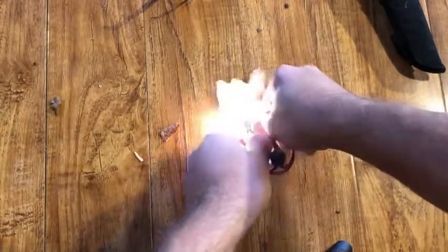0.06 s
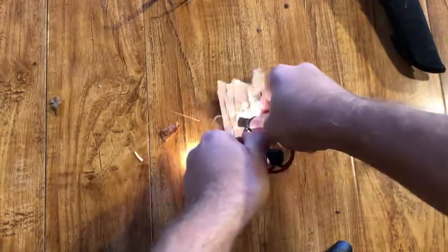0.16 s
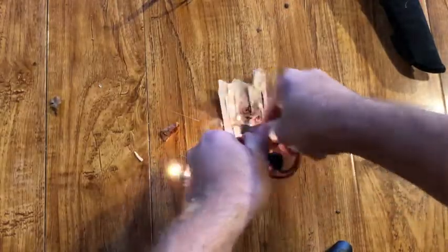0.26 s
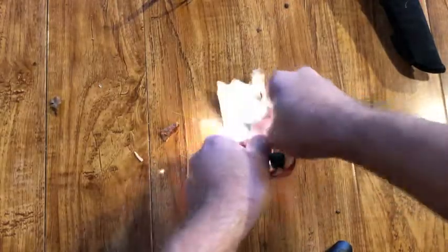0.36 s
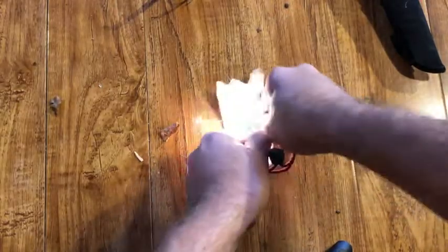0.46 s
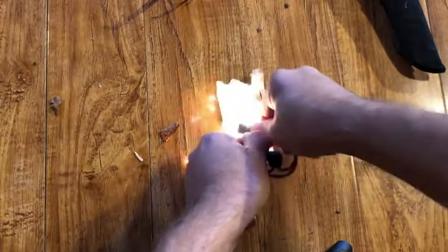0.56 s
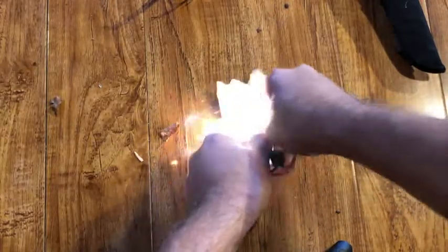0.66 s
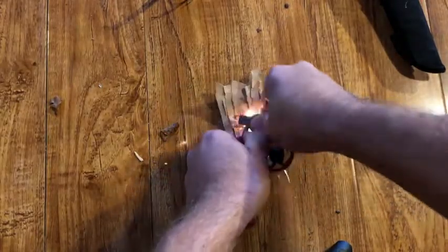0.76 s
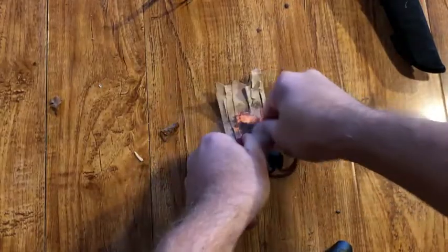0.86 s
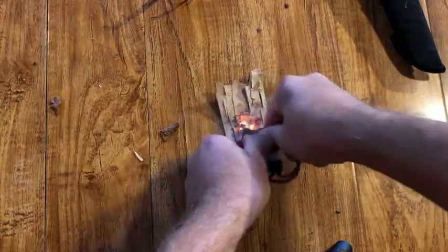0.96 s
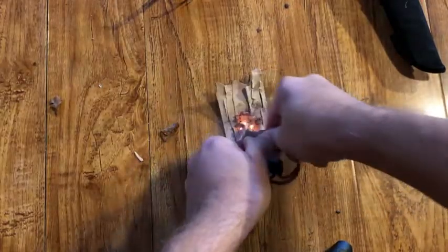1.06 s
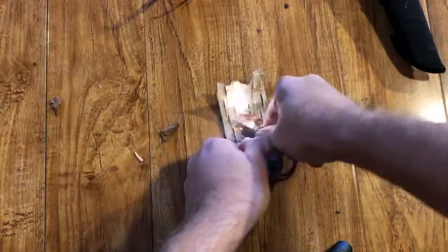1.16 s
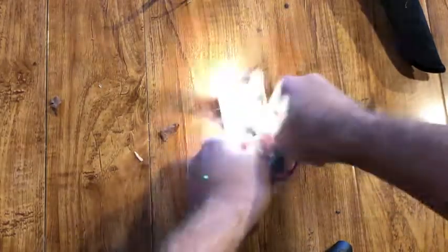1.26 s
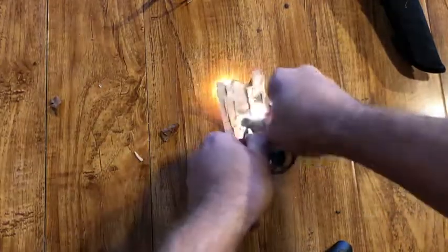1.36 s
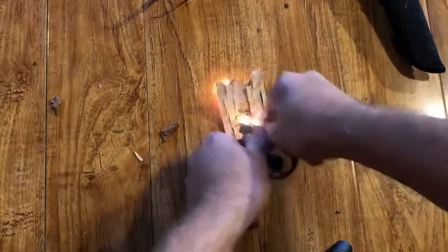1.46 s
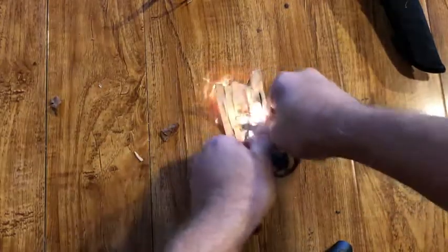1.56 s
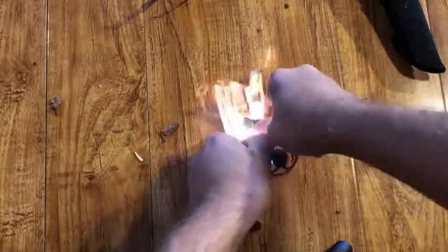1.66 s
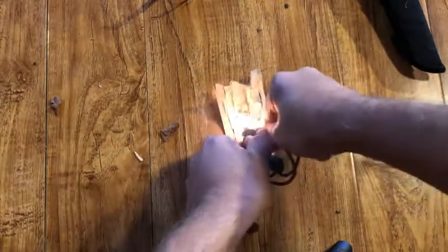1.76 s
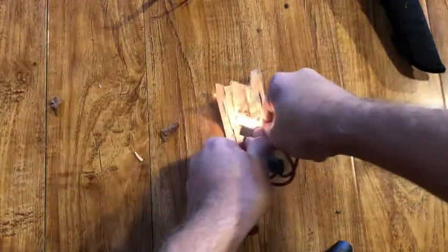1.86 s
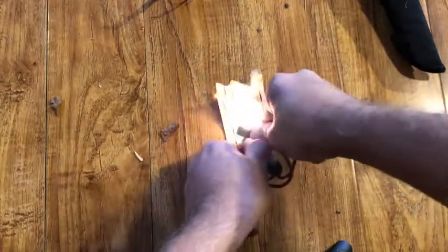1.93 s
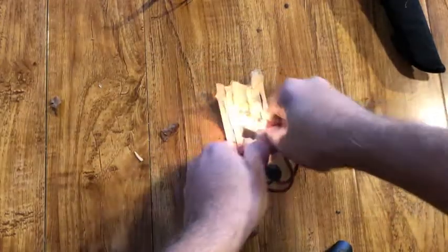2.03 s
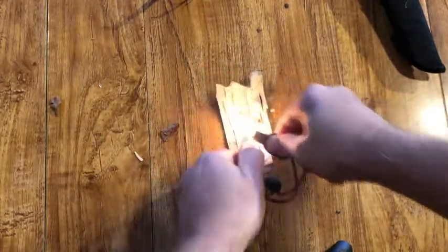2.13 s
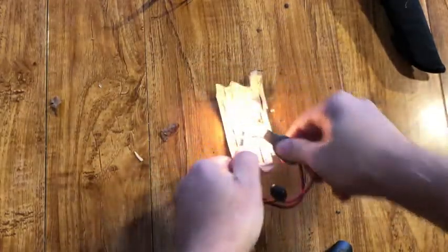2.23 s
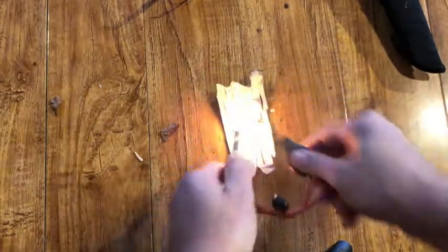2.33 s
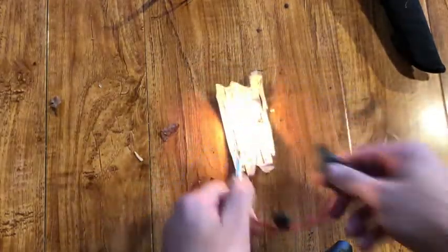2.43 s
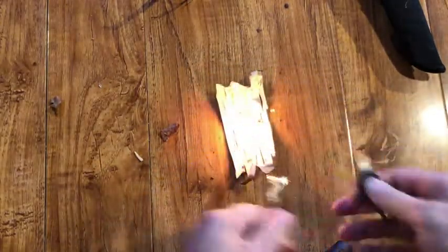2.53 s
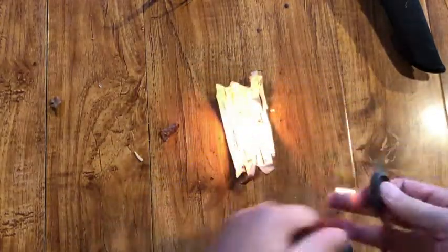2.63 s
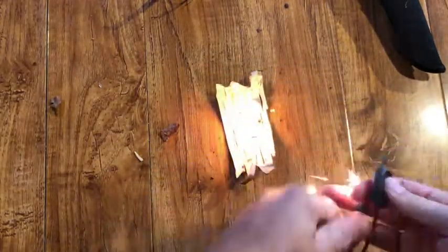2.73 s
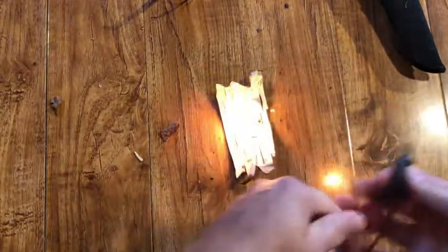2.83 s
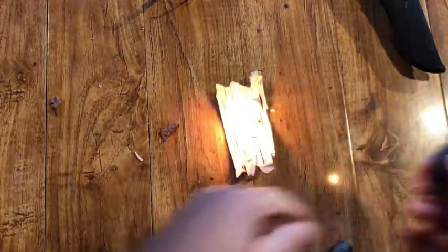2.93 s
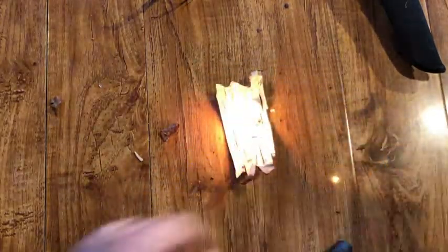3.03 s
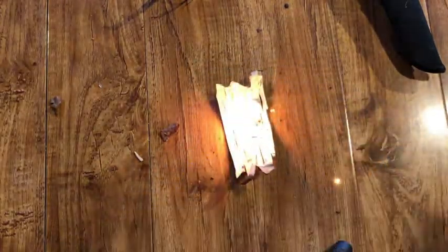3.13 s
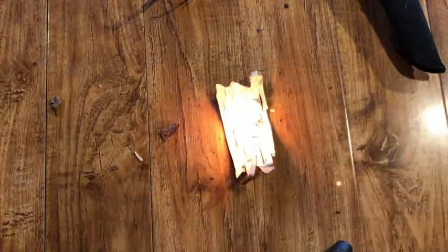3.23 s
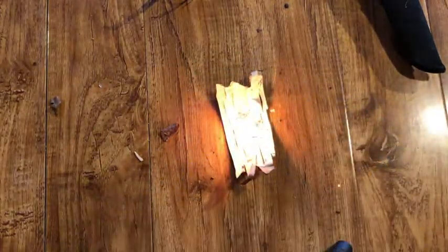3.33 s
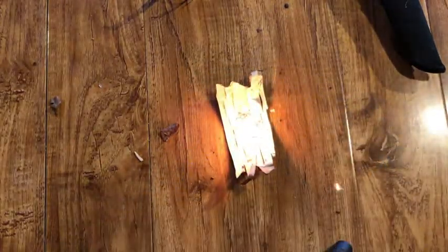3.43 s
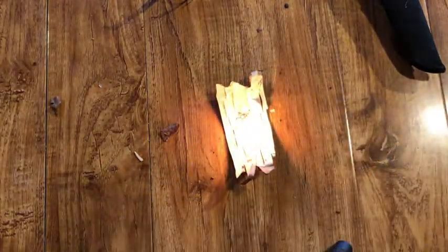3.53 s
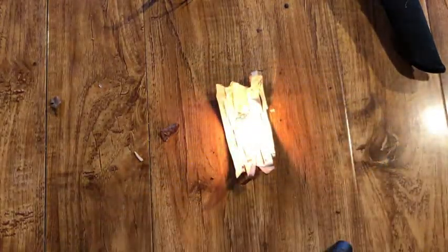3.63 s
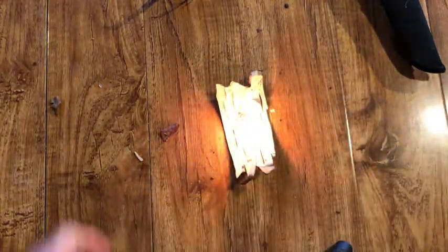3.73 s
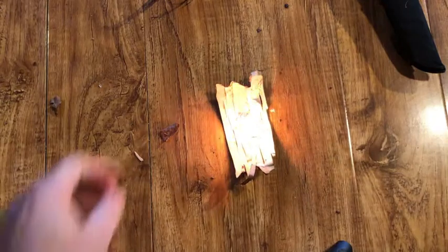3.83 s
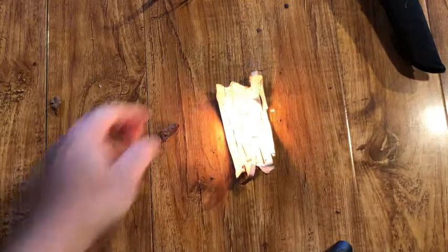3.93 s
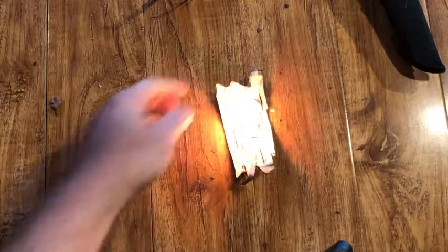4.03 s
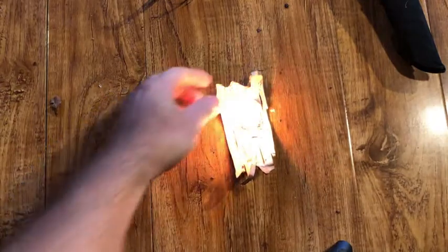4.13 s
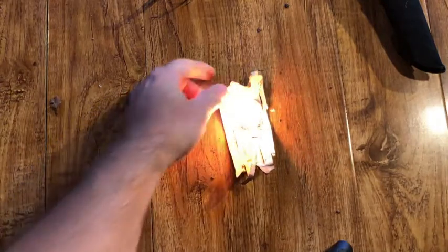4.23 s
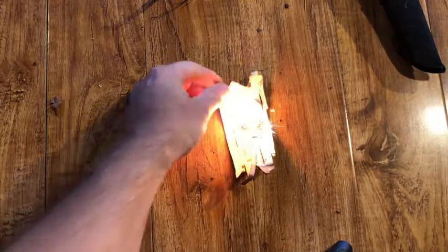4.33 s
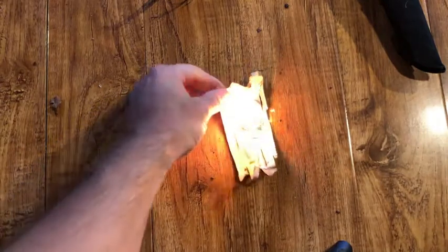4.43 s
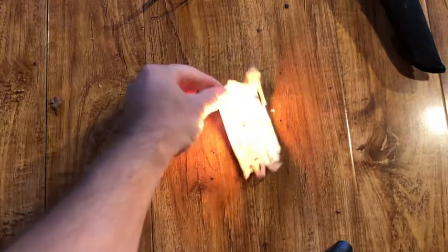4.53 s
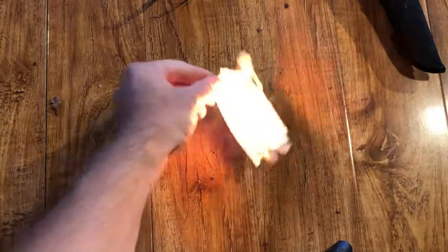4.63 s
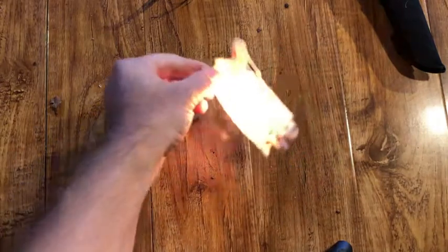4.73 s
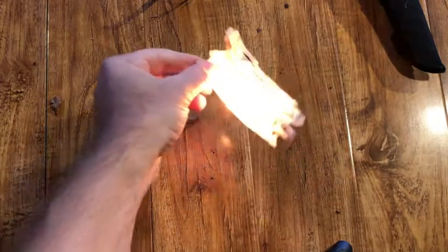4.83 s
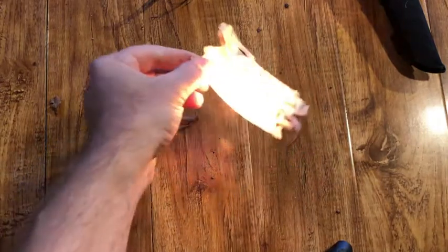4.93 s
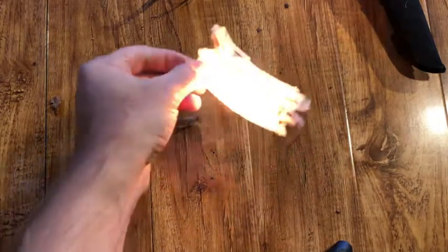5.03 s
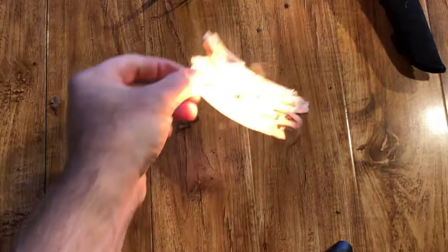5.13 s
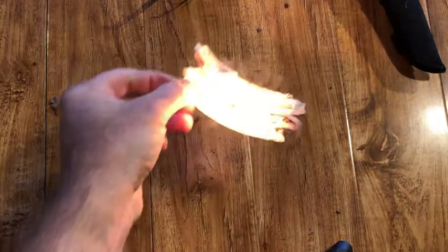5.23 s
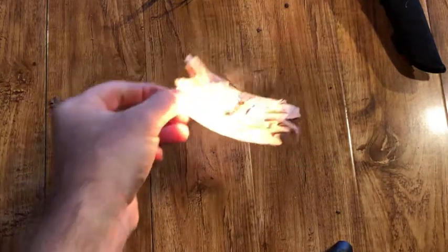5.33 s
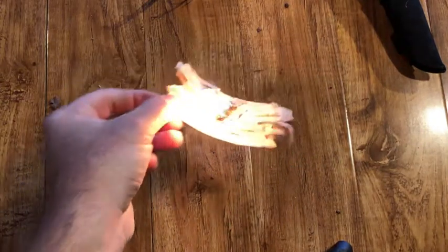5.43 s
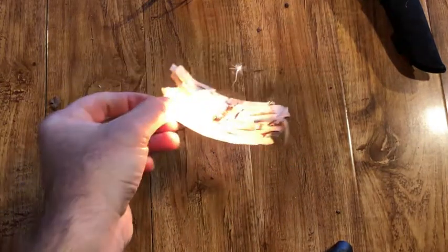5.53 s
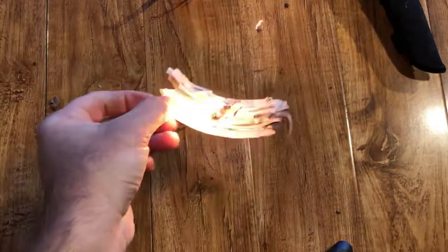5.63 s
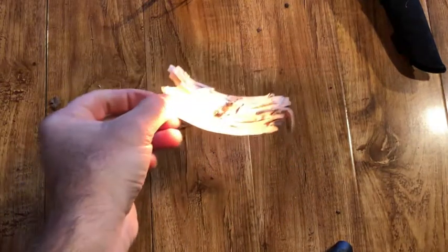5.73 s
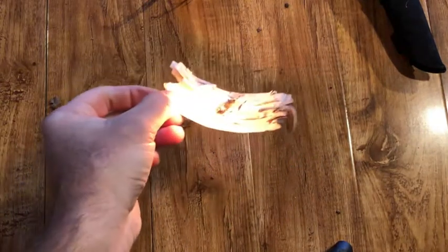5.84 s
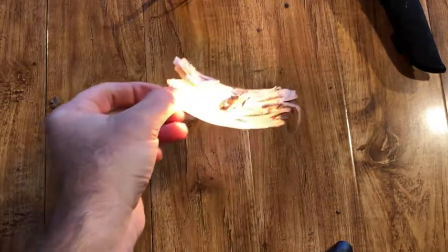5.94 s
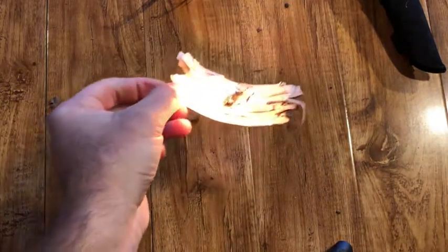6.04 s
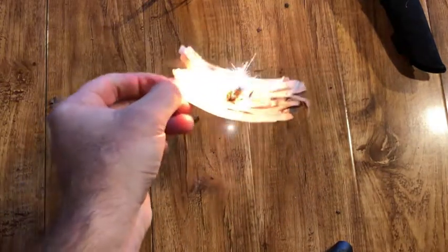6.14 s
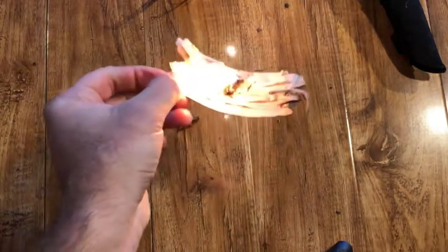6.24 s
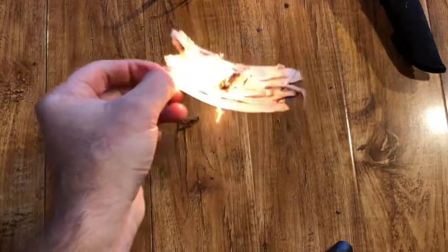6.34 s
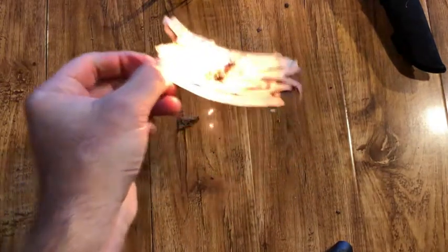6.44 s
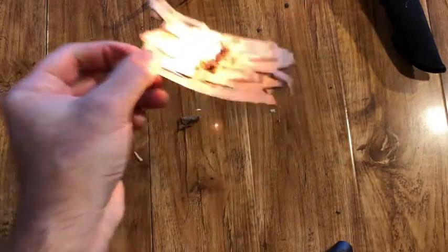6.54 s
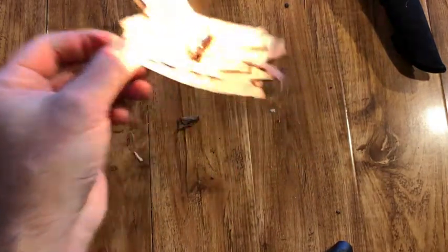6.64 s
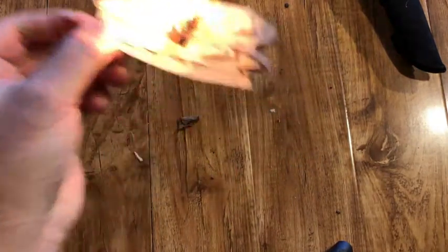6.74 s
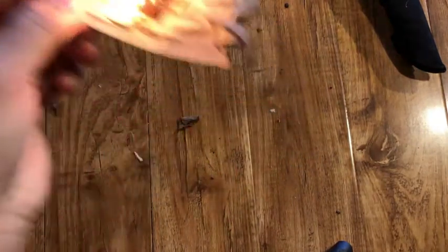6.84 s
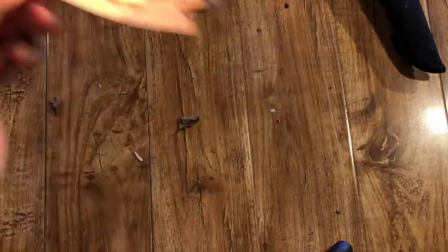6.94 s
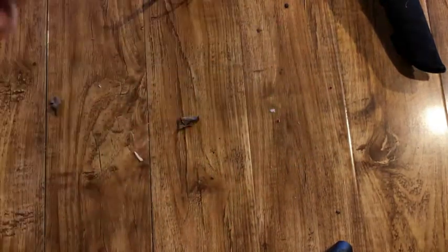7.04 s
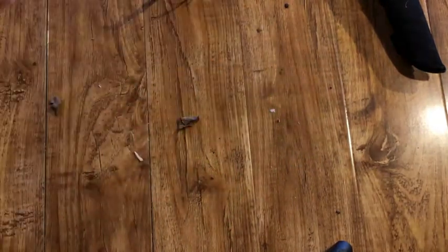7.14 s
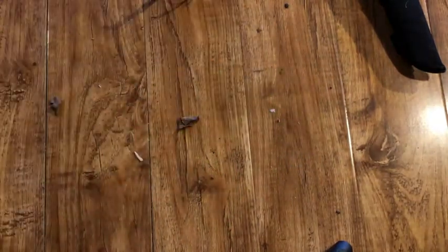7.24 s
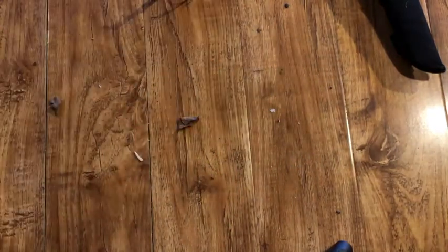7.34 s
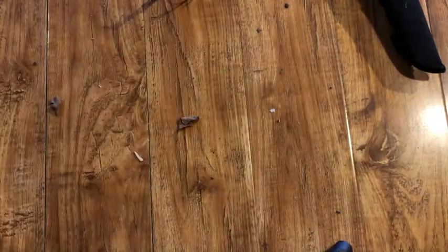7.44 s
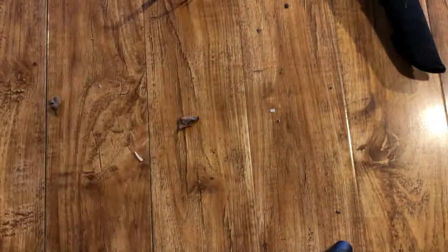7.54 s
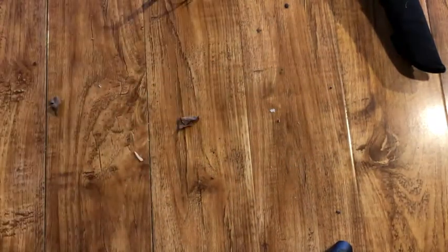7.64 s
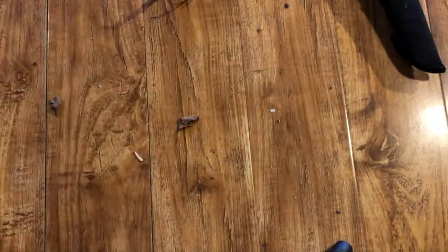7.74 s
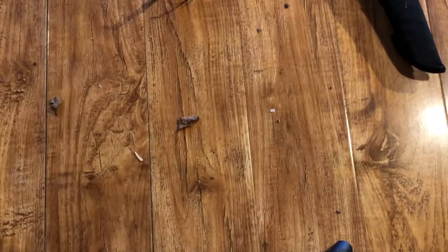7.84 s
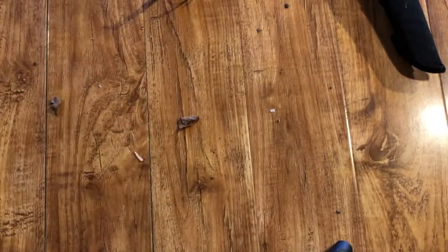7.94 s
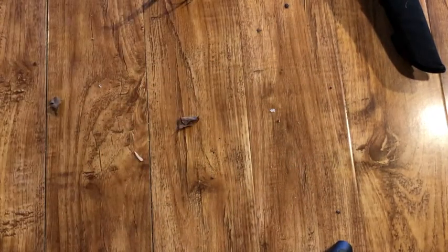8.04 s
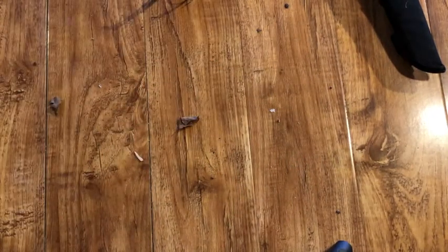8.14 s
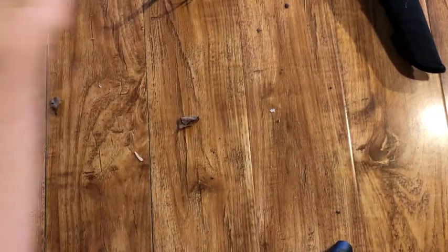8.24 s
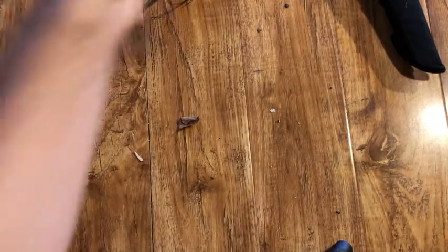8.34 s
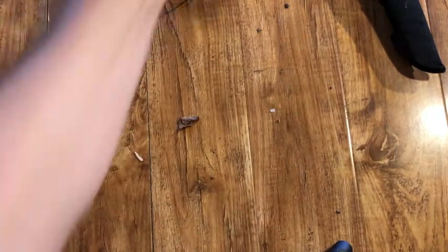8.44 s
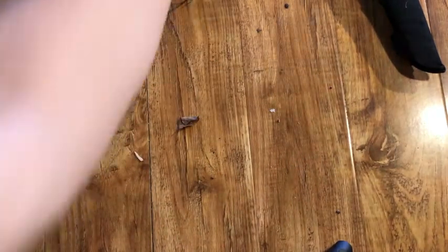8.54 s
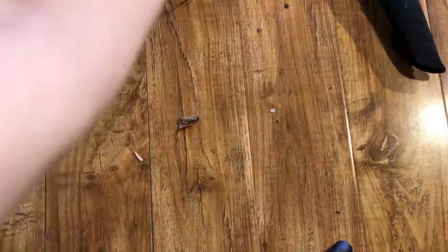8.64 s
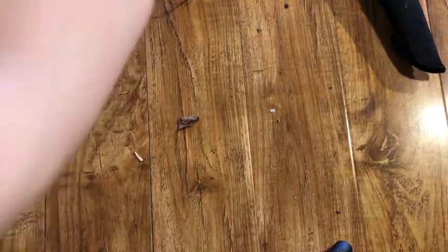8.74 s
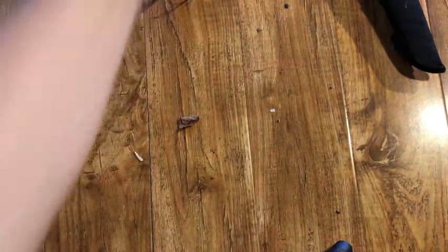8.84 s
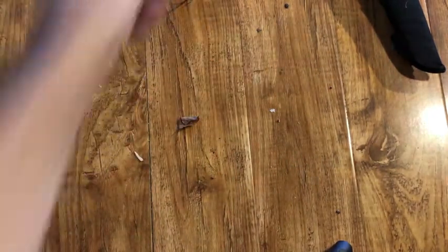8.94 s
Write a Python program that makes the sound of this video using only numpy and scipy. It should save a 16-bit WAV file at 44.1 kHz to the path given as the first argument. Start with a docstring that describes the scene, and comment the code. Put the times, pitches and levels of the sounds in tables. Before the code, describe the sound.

In a small, quiet room, close to the microphone, steel is scraped in fast uneven bursts, gritty and bright over a low table rumble. After two seconds it calms: hand brushes, tiny clinks, a sudden hard clatter on wood. Then dry little pops of burning bark, soft hand bumps, a breathy flame growing and fading near seven seconds, a late snap and bump, and light fumbling ticks.

```python
"""Quick gritty scrapes come first: a striker stick-slips along a fire steel pressed on a wooden table.
Random slips excite table and rod resonances, and shaped noise grains make the fizz of shavings and sparks.
Then birch bark crackles in noise pops, tools clink in ticks, and a hard thing lands on ringing wood modes.
Hands brush and bump, and a flame rushes in filtered noise as the bark is lifted.
A small quiet room reflects all but the flame; steady noise and draughts lie underneath."""
import sys
import numpy as np
from scipy import signal
from scipy.fft import rfft, irfft, next_fast_len
from scipy.io import wavfile
from scipy.ndimage import uniform_filter1d, map_coordinates

SR = 44100
rng = np.random.default_rng(int(sys.argv[2]) if len(sys.argv) > 2 else 0)


def dump_mix(stems):
    """Bounce the given channels to the path in sys.argv[1] as a 16-bit WAV at rate SR."""
    frames = np.atleast_2d(stems).T  # one column per channel
    limited = np.clip(frames, -1, 1)  # hard clip at full scale
    pcm = np.round(limited * 32767).astype(np.int16)
    wavfile.write(sys.argv[1], SR, pcm)


N = 396457

# All table levels are relative: each layer's gain and the room come on top.
# Pushes and returns of the striker:
# (start [s], length [s], table rumble [dB], rod rasp [dB], spark fizz [dB])
STROKES = [(0.0, 0.11, -30, -31, -38.5), (0.189, 0.062, -43, -40.5, -44), (0.32, 0.043, -44, -42, -59),
           (0.362, 0.053, -31, -31, -37), (0.483, 0.065, -53, -48, -47), (0.531, 0.05, -40, -41, -51),
           (0.645, 0.074, -33, -34.5, -40.5), (0.822, 0.18, -45.5, -44, -58),
           (1.145, 0.026, -38, -30.5, -48), (1.203, 0.045, -68, -53, -42.5), (1.276, 0.043, -32, -33, -40),
           (1.359, 0.043, -38.5, -40.5, -44), (1.438, 0.041, -38, -39.5, -50),
           (1.567, 0.065, -34, -31.5, -36.5), (1.705, 0.067, -41.5, -40.5, -45.5),
           (1.812, 0.063, -50, -49.5, -64.5), (1.91, 0.096, -58, -55, -56.5)]
# How each layer follows a stroke: (attack [s], sag while pushing [dB/s], release [dB/s])
RUMBLE_SHAPE = (.002, 35, 810)
RASP_SHAPE = (.013, 33, 500)
FIZZ_SHAPE = (0.0092, 35, 206)
# Resonances of the table and of the rod: (frequency [Hz], width [Hz], level [dB])
TABLE_RESONANCES = [(96.5, 12.3, -2.5), (160, 24, 2.5), (231, 34.3, 0), (307, 50, 2.5)]
ROD_RESONANCES = [(513, 40, -9), (645, 103, -10.5), (816, 76, -5), (1140, 110, -6.5), (1307, 106, -3),
                  (1531, 75, -3), (2126, 140, -9)]
# Spectrum of steel grit: (frequency [Hz], level [dB])
GRIT_SPECTRUM = [(1410, -39), (2400, -3), (3030, -9), (3340, -3), (4150, -3.5), (4650, -2.5), (5600, -10),
                 (7730, -11.5), (8450, -9.5), (13500, -15), (15000, -17.5), (15800, -40), (16500, -61)]


def scraping():
    """Stick-slip friction: irregular slips shake the table and the rod, and torn shavings fizz."""
    rumble = sum(amp(db) * gesture(s, length, *RUMBLE_SHAPE) for s, length, db, _, _ in STROKES)
    rasp = sum(amp(db) * gesture(s, length, *RASP_SHAPE) for s, length, _, db, _ in STROKES)
    fizz = sum(amp(db) * gesture(s, length, *FIZZ_SHAPE) for s, length, _, _, db in STROKES)
    chatter = amp(2.3 * wobble(170))
    slips = unit(chatter * grains(rate=1400, spread_db=3.5))
    table = amp(-3.5) * rumble * unit(resonate(slips, TABLE_RESONANCES))
    rod = amp(-0.62) * rasp * unit(resonate(slips, ROD_RESONANCES))
    shavings = chatter * amp(1.5 * wobble(300)) * grains(rate=1900, spread_db=5.5)
    shavings = shavings + 0.56 * slips
    # the steel's bright resonances shift as the contact point travels
    grit = unit(patchy(coloured(shavings, GRIT_SPECTRUM), depth_db=3.8))
    # where the fizz is weak it also sounds duller
    treble = filtered(grit, lambda f: f ** 4 / (f ** 4 + 5500 ** 4))
    dullness = 1 / (1 + fizz / amp(-74.5))
    return table, rod + amp(-1.37) * fizz * (grit - dullness * treble)


# The striker's edge catches on the rod: (time [s], crack level [dB], knock level [dB])
CATCHES = [(0.1481, -15.5, -47), (0.3661, -16, -47), (0.6781, -15, -29), (0.7323, -32, -23),
           (1.1484, -14, -28), (1.1546, -10.5, -33), (1.2812, -11.5, -37), (1.5266, -45, -26),
           (1.56, -27, -23), (1.5792, -17, -24)]


def catches():
    """Impulsive excitation: the edge bites with a gritty crack and drives the rod against the table."""
    out = np.zeros(N)
    for s, crack_db, knock_db in CATCHES:
        crack = coloured(burst(0.041), GRIT_SPECTRUM)
        knock = resonate(burst(0.019), TABLE_RESONANCES + ROD_RESONANCES[:2])
        add(out, s, crack_db - 23.0, crack)
        add(out, s, knock_db - 6.0, knock)
    return out


# Things land and rock on the table: (time [s], level [dB], top of the crack [Hz])
KNOCKS = [(3.7699, -16.5, 6000), (3.7749, -28.5, 5900), (3.8112, -24.5, 3000), (3.8564, -22.5, 5360),
          (3.8717, -17, 6000), (7.847, -58, 1470), (7.888, -40.5, 2180)]
# Modes of the knocked table top: (frequency [Hz], level [dB], t60 [s])
WOOD_MODES = [(576, 5.5, 0.026), (708, 4.5, 0.069), (1180, 19, 0.042), (1330, 9.5, 0.02), (1950, 4.5, .018),
              (2890, 2, 0.043), (4200, -32, 0.0058)]


def knocks():
    """Modal impact: a hard contact gives a crack, duller if softer, and damped modes of wood ring."""
    out = np.zeros(N)
    t = np.arange(SR // 4) / SR
    for s, db, top_hz in KNOCKS:
        ring = np.zeros(len(t))
        for hz, level, t60 in WOOD_MODES:
            decay = amp(level + 2 * rng.normal() - 60 * t / t60)
            softening = 1 / (1 + (hz / top_hz) ** 2)
            ring += decay * softening * np.sin(2 * np.pi * hz * t + rng.uniform(0, 2 * np.pi))
        crack = burst(0.02)
        crack[0] += 5
        spectrum = [(70, -30), (170, -7), (260, -5), (380, 4), (top_hz / 2, 1),
                    (top_hz, -5), (1.5 * top_hz, -18), (2.9 * top_hz, -28)]
        add(out, s, db - 14, ring)
        add(out, s, db - 4, coloured(crack, spectrum))
    return out


# Loud snaps of the burning bark: (time [s], level [dB], splutter gain [dB])
SNAPS = [(4.2696, -37, -42), (4.3878, -38, -38), (4.9679, -49.5, -53), (5.0218, -38.5, -34),
         (5.526, -21, -51), (5.5796, -28, -48), (5.9628, -41.5, -40), (5.9887, -35.5, -28.5),
         (6.0722, -42, -32), (6.132, -28, -15.5), (6.1535, -13.5, -29.5), (6.2738, -46.5, -22),
         (6.4557, -36.5, -30), (7.9031, -22.5, -38), (8.3206, -42.5, -40)]
# Spectrum of a snap: (frequency [Hz], level [dB])
SNAP_SPECTRUM = [(200, -16), (1000, -15), (2500, -13), (4000, -7), (8000, -9), (11000, -4), (16000, -10)]
# faint snaps fall at random times in this span
BURN_START_S, BURN_END_S = 2.0, 6.9


def crackle():
    """Sudden pressure release: a blister bursts in one spike, then a splutter of smaller ones."""
    out = np.zeros(N)
    ticks = [(BURN_START_S + when * (BURN_END_S - BURN_START_S), -47 - 10 * softness, -38)
             for when, softness in rng.random(size=(12, 2))]
    for s, db, splutter_db in SNAPS + ticks:
        splutter = 0.12 * burst(0.008) + amp(splutter_db) * burst(0.057)
        pop = 1.3 * spiky(splutter)
        pop[0] += 1
        add(out, s, db - 4.0, coloured(pop, SNAP_SPECTRUM))
    return out


# Light contacts of tools and fingers; the row at 4.3322 s is a faint repeat of the click just before: (time
# [s], level [dB], brightness [dB])
CLINKS = [(2.6085, -43, 21), (2.628, -48, 31), (2.6887, -44, -5), (2.704, -32.5, -15), (2.749, -46, -9),
          (2.9014, -38, -8), (4.3242, -25, -10.5), (4.3322, -32, -11), (8.745, -35, -12),
          (8.7715, -32.5, 1), (8.861, -39, -25), (8.9395, -37.5, 0), (8.961, -38, 9), (8.9844, -37.5, 6)]
# Spectrum of a light contact: (frequency [Hz], level [dB])
CLINK_SPECTRUM = [(200, -14), (800, -9.5), (1500, -6), (3000, -2.5), (6000, -1.5), (10000, -1.5),
                  (16000, -4.5)]


def clinks():
    """Brief collision: each light contact is a sharp tick and a short skid of tiny impacts."""
    out = np.zeros(N)
    for s, db, bright_db in CLINKS:
        # brightness tilts the treble up or down
        spectrum = [(hz, level + (bright_db + 9) * hz / (hz + 5000)) for hz, level in CLINK_SPECTRUM]
        tick_and_skid = burst(0.0092) + .13 * spiky(burst(0.1))
        add(out, s, db, coloured(tick_and_skid, spectrum))
    return out


# Fingers shift their grip on the tools and the bark: (start [s], length [s], level [dB])
FUMBLES = [(2.553, .17, -65), (4.934, .09, -73), (8.733, .26, -58)]
# Envelope of a grip shift: (attack [s], sag [dB/s], release [dB/s])
FUMBLE_SHAPE = (0.0031, 7.4, 250)
FUMBLE_PER_S = 330  # mean rate of tiny contacts


def fumble():
    """Random impact train: shifting fingers make an uneven patter of contacts of very unequal size."""
    contacts = grains(rate=FUMBLE_PER_S, spread_db=9.5) * amp(3 * wobble(45))
    patter = unit(coloured(contacts, CLINK_SPECTRUM))
    return sum(amp(db) * gesture(s, length, *FUMBLE_SHAPE) for s, length, db in FUMBLES) * patter


# Hands and sleeves brush the table: (start [s], length [s], level [dB])
BRUSHES = [(1.074, 0.048, -51), (2.276, .075, -61.5), (2.498, .1, -58), (2.767, 0.049, -54),
           (5.52, 0.056, -47.5), (5.612, 0.037, -57), (7.841, 0.057, -47.5)]
# Envelope of a brush: (attack [s], sag [dB/s], release [dB/s])
BRUSH_SHAPE = (0.0057, 54, 350)
# Spectrum of skin and cloth on wood: (frequency [Hz], level [dB])
CLOTH_SPECTRUM = [(71, -11), (120, -8), (277, -10.5), (447, 2.5), (897, -0.5), (1190, -0.5), (2200, -6),
                  (4320, -16), (14000, -30)]
# Soft bumps of the hand: (time [s], level [dB])
BUMPS = [(4.139, -40.5), (4.153, -53), (4.322, -46), (6.107, -39.5), (6.184, -45.5), (7.861, -32.5),
         (8.767, -45.5)]
# A soft fingertip passes only the deepest part of a blow: (frequency [Hz], level [dB])
SOFT_SPECTRUM = [(60, 0), (100, 3.5), (180, 2), (300, -9.5), (600, -12), (2000, -36)]


def hands():
    """Soft friction and contact: skin and cloth rub the wood; bumps stir the table's low modes."""
    level = sum(amp(db) * gesture(s, length, *BRUSH_SHAPE) for s, length, db in BRUSHES)
    rubbing = grains(rate=1800, spread_db=3.5) * amp(2.64 * wobble(90))
    out = level * unit(patchy(coloured(rubbing, CLOTH_SPECTRUM), depth_db=3.5))
    for s, db in BUMPS:
        add(out, s, db - 7.5, coloured(resonate(burst(0.098), TABLE_RESONANCES), SOFT_SPECTRUM))
    return out


# the flame flares as the bark is lifted towards the microphone
FLARE_PEAK_S, FLARE_REFERENCE_DB = 6.79, -67
RUSH_RISE_DB_PER_S, WHISTLE_RISE_DB_PER_S, FLARE_FALL_DB_PER_S = 16, 9.5, 40.5


def flame():
    """Turbulent flow noise: a soft rush swells and recedes; a faint whistle in it grows more slowly."""
    t = np.arange(N) / SR - FLARE_PEAK_S

    def swell(rise_db_per_s):
        """Exponential growth up to the peak, then exponential decay."""
        return amp(FLARE_REFERENCE_DB + np.minimum(rise_db_per_s * t, -FLARE_FALL_DB_PER_S * t))

    whistle = unit(resonate(rng.standard_normal(N), [(1260, 53, 0)]))
    rush_spectrum = [(60, -2), (200, -1.0), (500, -9.5), (3000, -17), (14000, -29.5)]
    rush = unit(coloured(rng.standard_normal(N), rush_spectrum))
    return amp(-5.5) * swell(WHISTLE_RISE_DB_PER_S) * whistle + amp(4.5) * swell(RUSH_RISE_DB_PER_S) * rush


# Ceiling reflections: (delay [s], level [dB], centre [Hz], width [octaves])
CEILING_ECHOES = [(.01896, -5.5, 1100, 1.25), (.01796, -12, 4200, .8)]
# Reverberation time of the room: (frequency [Hz], t60 [s])
ROOM_DECAY = [(150, 0.25), (400, 0.23), (1000, 0.27), (2800, 0.32), (7300, 0.26), (15000, 0.23)]


def room(x, echo_db, tail_db, wall_db=-14, build_up=0.0045):
    """Reflection and reverberation: ceiling and wall echoes, then a diffuse tail with weak treble."""
    def band(f, centre, octaves):
        """Bell-shaped passband on an octave axis."""
        return np.exp(-.5 * (np.log2((f + 1) / centre) / octaves) ** 2)

    def ceiling(f):
        """Inverted, band-limited delays."""
        return -sum(amp(db) * band(f, c, w) * np.exp(-2j * np.pi * f * s) for s, db, c, w in CEILING_ECHOES)

    def wall(f):
        """One band-limited delay of 41.3 ms."""
        return band(f, 1400, 1.1) * np.exp(-2j * np.pi * f * .0413)

    echo = filtered(x, lambda f: amp(echo_db) * ceiling(f) + amp(wall_db) * wall(f))
    # the tail is noise that builds up softly and decays at its own pace in each band
    hz, t, z = signal.stft(rng.standard_normal((2, SR // 2)), SR, nperseg=256)
    colour = amp(along([(100, 0.5), (400, 2.5), (1800, -5.5), (5000, -11.5), (14000, -18)], hz))[:, None]
    decay = amp(-60 * t / along(ROOM_DECAY, hz)[:, None])
    onset = 1 - np.exp(-(t / build_up) ** 2)
    tail = signal.istft(z * colour * decay * onset, SR, nperseg=256)[1]
    mid, side = signal.fftconvolve(x[None], tail / np.linalg.norm(tail[0]), axes=1)[:, :N]
    return x + echo + amp(tail_db) * (mid + np.outer([.1, -.1], side))


# Course of the room noise: (time [s], level [dB])
QUIET = [(2.2, -70.5), (6.5, -71.5), (8.7, -68)]
# Spectrum of the room noise: (frequency [Hz], level [dB])
AIR_SPECTRUM = [(20, -31.5), (30, -11), (42, -50), (60, -16.5), (80, -40.5), (150, -29.5), (500, -35.5),
                (1200, -39), (2800, -44.5), (12000, -53.5), (16000, -57)]


def air():
    """Stationary noise and pressure fluctuation: room noise, and slow draughts on the microphone."""
    level = amp(np.interp(np.arange(N) / SR, *np.transpose(QUIET)) + 2.0)
    mid, side = [unit(coloured(rng.standard_normal(N), AIR_SPECTRUM, size=8192)) for _ in range(2)]
    # pressure fluctuations around 6 Hz
    draught = unit(filtered(rng.standard_normal(N), lambda f: np.exp(-((f - 6) / 3) ** 2)))
    gusts = unit(draught * amp(4.8 * wobble(0.53)))
    return level * (mid + np.outer([.15, -.15], side)) + amp(-48) * gusts


def gesture(start, length, attack_s, sag_db_per_s, release_db_per_s):
    """Envelope of one rubbing move: it builds up, sags while it lasts, then dies away."""
    out, t = np.zeros(N), np.arange(SR // 2) / SR
    fade_db = sag_db_per_s * np.minimum(t, length) + release_db_per_s * np.maximum(t - length, 0)
    part = out[max(round(start * SR), 0):][:len(t)]
    part += ((1 - np.exp(-t / attack_s)) * amp(-fade_db))[:len(part)]
    return out


def grains(rate, spread_db):
    """Random point process: rate impulses a second on average, of scattered size, rms 1."""
    hits = rng.random(N) < rate / SR
    sizes = amp(spread_db * np.clip(rng.standard_normal(N), -2, 2))
    return unit(hits * rng.choice([-1, 1], N) * sizes)


def burst(t60):
    """Exponential decay: noise that dies away, a quarter second long."""
    t = np.arange(SR // 4) / SR
    return rng.standard_normal(len(t)) * amp(-60 * t / t60)


def spiky(x):
    """Random amplitude modulation: noise broken into tiny impacts of very unequal size."""
    return x * amp(6 * np.clip(rng.standard_normal(len(x)), -2, 2) - 4)


def patchy(x, depth_db):
    """Time-frequency modulation: bright patches drift in time and frequency."""
    z = signal.stft(x, nperseg=512)[2]
    field = uniform_filter1d(rng.standard_normal(z.shape), size=4, axis=0)
    field = uniform_filter1d(field, size=7, axis=1)
    return signal.istft(z * amp(depth_db * unit(field)), nperseg=512)[1][:N]


def wobble(rate):
    """Slow modulation: a smooth random curve, rate knots a second."""
    knots = rng.standard_normal(int(N * rate / SR) + 4)
    return map_coordinates(knots, [np.arange(N) * rate / SR])


def resonate(x, modes):
    """Modal resonance: parallel damped resonators of alternating sign."""
    def response(f):
        """Sum of the resonance curves."""
        return sum((-1) ** k * amp(db) * 1j * f * width / (hz * hz - f * f + 1j * f * width)
                   for k, (hz, width, db) in enumerate(modes))

    return filtered(x, response)


def coloured(x, spectrum, size=2048):
    """Minimum-phase filtering: the causal filter with this spectrum, by folding its cepstrum."""
    cepstrum = irfft(np.log(amp(along(spectrum, np.fft.rfftfreq(size, 1 / SR)))))
    fold = 1 + np.sign(np.fft.fftfreq(size))
    return signal.fftconvolve(x, irfft(np.exp(rfft(cepstrum * fold))))[:len(x)]


def filtered(x, response):
    """Linear filtering: the spectrum of x times a response of frequency."""
    m = next_fast_len(x.shape[-1] + SR // 4)
    return irfft(rfft(x, m) * response(np.fft.rfftfreq(m, 1 / SR)), m)[..., :x.shape[-1]]


def along(points, hz):
    """Interpolation of (frequency, value) points on a log-frequency axis."""
    f, v = np.transpose(points)
    return np.interp(np.log(hz + 1), np.log(f), v)


def add(track, s, db, sound):
    """Superposition: mix in a sound whose loudest millisecond has the given level."""
    part = track[round(s * SR):][:len(sound)]
    loudest = np.sqrt(uniform_filter1d(sound ** 2, size=44).max())
    part += amp(db) / loudest * sound[:len(part)]


def amp(db):
    """Logarithmic level: decibels to gain."""
    return 10 ** (np.asarray(db) / 20)


def unit(x):
    """Normalisation to rms 1."""
    return x / np.sqrt(np.mean(x ** 2) + 1e-20)


# Share of the table's shaking that differs between left and right: (frequency [Hz], share [ratio])
LEAN = [(70, .08), (100, 0.48), (140, 0.9), (175, 1), (260, 0.066), (500, 0.2), (1000, 0.039)]


def scene():
    """Superposition of all sources; the table's low modes reach the left side more strongly."""
    table, steel = scraping()
    body = room(table + catches(), echo_db=-2.0, tail_db=-19.5)
    lean = filtered(body, lambda f: along(LEAN, f) * np.exp(.75j))
    direct = room(steel, echo_db=3.5, tail_db=-16.0)
    direct = direct + room(knocks(), echo_db=8, tail_db=-7.0, wall_db=-9, build_up=0.022)
    direct = direct + room(clinks() + fumble(), echo_db=4.5, tail_db=-8.5)
    direct = direct + room(crackle(), echo_db=-3, tail_db=-10)
    direct = direct + room(hands(), echo_db=1.5, tail_db=-18.5)
    direct = direct + flame()
    # a quarter-turn side signal puts the treble slightly out of step between left and right
    side_share = [(1000, .02), (4000, 0.033), (8000, 0.17), (13000, 0.033)]
    spread = filtered(direct, lambda f: 1j * along(side_share, f))
    return body + direct + (lean + spread) * [[1], [-1]] + air()


def record(dry):
    """Band limitation: a steep low-pass removes what lies above 16.4 kHz."""
    return filtered(dry, lambda hz: 1 / (1 + (hz / 16400) ** 120))


dry = scene()
out = record(dry)
dump_mix(out)
```